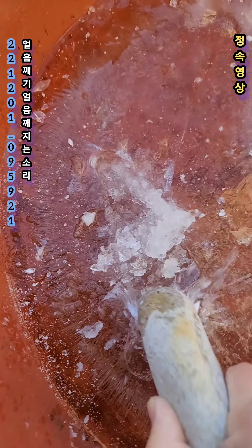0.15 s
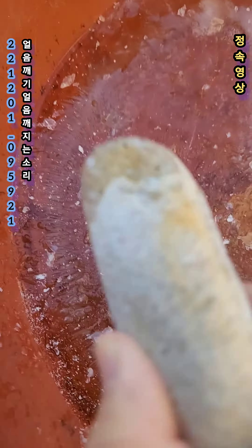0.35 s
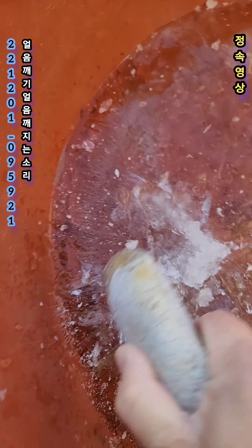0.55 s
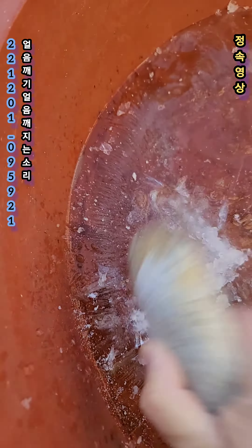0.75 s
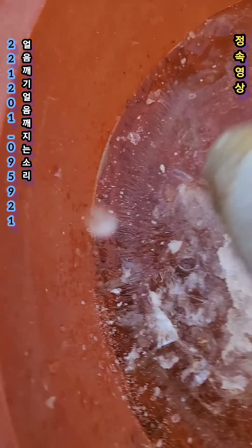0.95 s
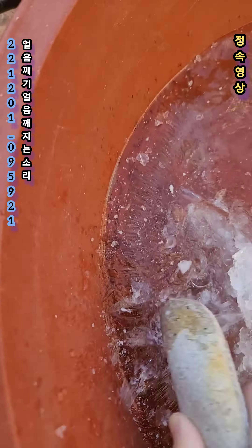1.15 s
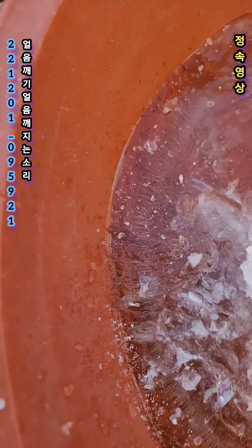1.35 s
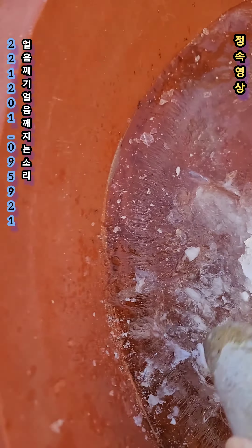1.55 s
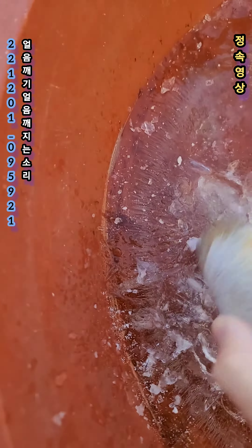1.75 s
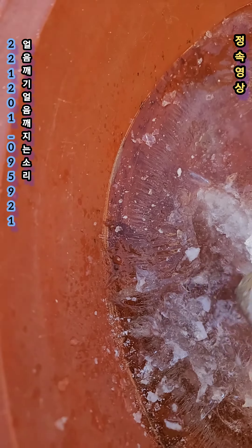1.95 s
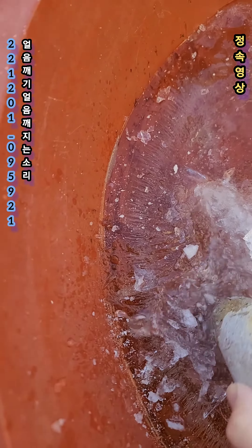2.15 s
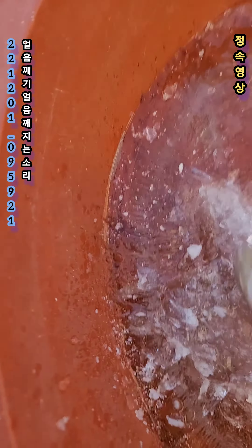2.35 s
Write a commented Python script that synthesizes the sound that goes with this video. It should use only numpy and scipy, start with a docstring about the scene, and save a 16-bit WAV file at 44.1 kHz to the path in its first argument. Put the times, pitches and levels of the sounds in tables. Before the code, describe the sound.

Ice in a plastic tub pounded with a club, seven sharp cracking blows and hollow thuds

```python
"""A wavering low hum in faint outdoor air and one ticking chip, then a club pounds ice in a plastic tub seven times.
Each blow snaps and crushes the ice (filtered noise grains) and draws a short hollow note and clacks (decaying sines).
The tub then rocks on the ground in uneven thuds, mostly softer and softer (a falling sweep and damped modes).
Rattle, chips, crumbs, spray and a last swell of noise at the end are filtered grains too;
the surroundings return a faint tail of decaying noise."""
import sys
import numpy as np
from scipy import signal
from scipy.fft import rfft, irfft
from scipy.io import wavfile

SR = 44100
rng = np.random.default_rng(int(sys.argv[2]) if len(sys.argv) > 2 else 0)


def dump_mix(stems):
    """Bounce the given channels to the path in sys.argv[1] as a 16-bit WAV at rate SR."""
    frames = np.atleast_2d(stems).T  # one column per channel
    limited = np.clip(frames, -1, 1)  # hard clip at full scale
    pcm = np.round(limited * 32767).astype(np.int16)
    wavfile.write(sys.argv[1], SR, pcm)


N = 110250  # samples in the scene
T = np.arange(round(.4 * SR)) / SR  # time axis of a single sound [s]
BEND_LEAD_S = 0.0022  # the bending wave starts this long before the nominal time of a thud or blow


def amp(db):
    """Level law: decibels to amplitude gain."""
    return 10 ** (np.asarray(db) / 20)


def unit(x):
    """Normalisation of mean power: scales to rms 1."""
    return x / np.sqrt(np.mean(x ** 2) + 1e-20)


def read(points, hz):
    """Interpolation of a (frequency, value) table along a logarithmic frequency axis."""
    f, value = np.transpose(points)
    return np.interp(np.log(hz + 1), np.log(f), value)


def add(mix, s, sound):
    """Superposition: sums a stereo sound into the mix from time s [s], cut at the end of the mix."""
    part = mix[:, max(round(s * SR), 0):][:, :sound.shape[1]]
    part += sound[:, :part.shape[1]]


def pan(db):
    """Interchannel level difference: gains of the two channels for left minus right [dB]."""
    return amp([[db / 2], [-db / 2]])


def fade(t, t60):
    """Exponential decay from t = 0, falling 60 dB in t60 seconds."""
    return np.exp(-np.log(1000) * np.maximum(t, 0) / t60)


def heard(lag_s):
    """Interchannel time difference: time since onset in each channel; a positive lag delays the right."""
    return np.maximum(T - np.array([[max(-lag_s, 0)], [max(lag_s, 0)]]), 0)


def colour(x, points, tilt_db=0, ring_hz=1000, ring_db=0, ring_octaves=0.26):
    """Minimum-phase filter of unit energy: a spectrum, one broad ring, and chance resonances."""
    size = 2048
    ripple_db, ripple_width = 3, .05
    hz = abs(np.fft.fftfreq(size, 1 / SR))
    octaves = np.log2(1 + hz / 1000)  # flattens below 1 kHz
    knots = np.arange(0, 5, 2 * ripple_width)
    ripple = np.interp(octaves, knots, rng.standard_normal(len(knots)))
    ring = np.exp(-(np.log2((hz + 1) / ring_hz) / ring_octaves) ** 2)
    gain_db = read(points, hz) + tilt_db * octaves + ring_db * ring + ripple_db * ripple
    log_gain = np.log(amp(gain_db))
    # the Hilbert transform of the log gain gives the phase of a causal filter
    response = np.exp(np.conj(signal.hilbert(log_gain)))
    taps = np.fft.ifft(response).real[:size // 2]
    taps = taps / np.linalg.norm(taps)
    return signal.fftconvolve(x, taps[None], axes=1)[:, :x.shape[1]]


def grains(per_s, spread_db, grain_s, shared):
    """Shot noise: random bursts whose power decays over grain_s; a share of power is alike in both channels."""
    hits = rng.random(len(T)) < per_s / SR
    size = amp(spread_db * np.minimum(rng.exponential(1, len(T)), 4)) * hits
    power = signal.lfilter([1], [1, -np.exp(-1 / (grain_s * SR))], size ** 2)
    noise = rng.standard_normal((3, len(T)))
    shared = np.clip(shared, 0, 1)
    stereo = np.sqrt(shared) * noise[0] + np.sqrt(1 - shared) * noise[1:]
    return unit(np.sqrt(power) * stereo)


def background():
    """Modulated tone in shaped noise: a wavering low hum in outdoor air, whose bass is coherent."""
    # spectrum of the outdoor air: (frequency [Hz], relative level [dB])
    air_colour = [(20, -32), (45, -10), (80, -5), (130, -19.5), (250, -32.5), (400, -40), (700, -37),
                  (1200, -45.5), (2500, -49.5), (5000, -55.5), (7000, -55.5), (16000, -62.5)]
    air_db, hum_db, hum_hz = -36.5, -38, 64.9
    hz, t = np.fft.rfftfreq(N, 1 / SR), np.arange(N) / SR
    noise = rfft(rng.standard_normal((4, N)))
    same = 1 / (1 + (hz / 500) ** 2)  # share of power common to both channels
    stereo = np.sqrt(same) * noise[0] + np.sqrt(1 - same) * noise[1:3]
    air = unit(irfft(stereo * amp(read(air_colour, hz)), N))
    # slow noise sways both amplitude (fraction) and phase [rad]
    waver = .25 * unit(irfft(noise[3] * np.exp(-(hz / 5) ** 2), N))
    hum = unit((1 + waver) * np.sin(2 * np.pi * hum_hz * t + waver))
    return amp(air_db) * air + amp(hum_db) * hum


def chips_and_bursts():
    """Superposed grains: single chips tick; soft bursts of noise swell quickly and thin out."""
    # chips of ice landing: (time [s], level [dB], treble tilt [dB per octave])
    chip_table = [(0.0157, -42, -4.5), (0.208, -41, 1), (0.271, -49, -3), (0.3325, -43.5, -5),
                  (0.351, -34, 4.5), (0.5271, -43.5, -9.5), (0.7972, -28, 1), (.841, -28.5, -6),
                  (0.8652, -38, -7), (.9093, -27, 7), (0.929, -43, -17), (0.94, -40, -11), (1.026, -44, -2),
                  (1.0825, -45.5, 2), (1.162, -35, -10), (1.232, -35, -1), (1.267, -39, -9.5),
                  (1.3263, -40, -5)]
    # soft bursts of noise: crumbs, spray, and a last swell of noise at the end:
    # (time [s], length [s], level [dB], treble tilt [dB per octave])
    burst_table = [(0.11, 0.062, -59, 8), (0.45, 0.09, -49, -3.5), (0.776, 0.12, -40.5, -2),
                   (0.875, 0.096, -35.5, -12), (1.14, 0.12, -44.5, -1.5), (1.485, 0.088, -45.5, -5.5),
                   (1.815, .14, -42, -2.5), (2.102, 0.082, -31.5, -11.5), (2.179, .13, -50.5, -2),
                   (2.413, 0.1, -49.5, -5.5), (2.484, 0.07, -31, -7.5)]
    # spectra of a chip and of the soft bursts: (frequency [Hz], relative level [dB])
    chip_colour = [(500, -35), (2000, -6.5), (4000, -12.5), (6500, -2), (9000, -7), (12000, 1.5),
                   (16000, 0.5)]
    burst_colour = [(200, -5.5), (700, 3), (1600, 0), (3000, 0), (4500, -1.5), (6500, 2.5), (9000, -5.5),
                    (12500, 2), (16000, -9)]
    out = np.zeros((2, N))
    for s, db, tilt_db in chip_table:
        tick = grains(per_s=2000, spread_db=0.5, grain_s=0.00013, shared=0.17) * fade(T, 0.033)
        add(out, s, amp(db) * colour(tick, chip_colour, tilt_db))
    for s, length, db, tilt_db in burst_table:
        arch = np.sin(np.pi * np.minimum(T / length, 1) ** 0.67)
        for _ in range(4):  # layers, each with its own chance resonances
            burst = grains(per_s=800, spread_db=3, grain_s=.0008, shared=.15)
            add(out, s, amp(db) / 2 * colour(arch * burst, burst_colour, tilt_db))
    return out


def ice_note(note_hz):
    """Modal synthesis: a hollow note whose side modes are detuned at random each time."""
    # modes of the struck ice: (nominal multiple of the note, level [dB], t60 [s])
    ice_modes = [(1, 3, 0.032), (.86, -33.5, 0.089), (1.15, -14, 0.055), (1.36, -25, 0.084),
                 (1.6, -13, 0.022), (2.35, -23.5, 0.031), (3.05, -36.5, 0.1), (3.9, -7.5, 0.0082)]
    t = heard(.00008)
    detune = rng.uniform(-0.83, 1, len(ice_modes))
    note = 0
    for (ratio, db, t60), d in zip(ice_modes, detune):
        hz = note_hz * ratio ** (1 + 0.124 * d)
        note = note + amp(db) * fade(t, t60) * np.sin(2 * np.pi * hz * t)
    return pan(-3.5) * note


def tub_thud():
    """Dispersion and modal decay: a falling bending wave runs through the tub and its low modes ring."""
    # modes of the filled tub: (frequency [Hz], level [dB], t60 [s], direction of swing [signed factor])
    tub_modes = [(73.7, -8, 0.22, -0.64), (88.15, -5, 0.91, -0.081), (155.5, -3, 0.11, -0.75),
                 (202.1, -21, 0.15, 0.52), (229.2, 7.5, 0.03, 0.63), (277, -2, 0.058, 0.2),
                 (600, -16.5, 0.029, -0.48), (703, -19, 0.024, 0.74)]
    # the highs of a bending wave arrive first
    from_hz, to_hz, glide_s, peak_s, bend_db = 1667, 188.7, 0.0009714, 0.0086, -7
    settle_s = 0.0016  # the modes start this long after the nominal time
    t = heard(.00025)
    turns = to_hz * t + (from_hz - to_hz) * glide_s * (1 - np.exp(-t / glide_s))
    swell = (t / peak_s * np.exp(1 - t / peak_s)) ** 2
    bend = swell * np.sin(2 * np.pi * turns)
    u = np.maximum(t - BEND_LEAD_S - settle_s, 0)
    ring = 0
    for hz, db, t60, swing in tub_modes:
        ring = ring + swing * amp(db) * fade(u, t60) * np.sin(2 * np.pi * hz * u)
    soft = signal.butter(2, 1100, fs=SR, output="sos")
    return pan(-0.5) * signal.sosfilt(soft, ring - amp(bend_db) * bend)


def blows():
    """Impact and fracture: the club touches, snaps and crushes the sheet while ice and tub ring."""
    # blows of the club: (time [s], snap level [dB], snap ring [Hz], ring boost [dB],
    # crunch level [dB], crunch length before decay [s], crunch ring [Hz], ring boost [dB],
    # crunch tilt [dB per octave], hollow note [Hz], note level [dB], note delay [s],
    # first touch level [dB], tub level [dB])
    blow_table = [(0.1209, -2.5, 3380, 16, -24.5, 0.0025, 5140, 17, 1, 510.5, -1.5, 0.0013, -13, 1),
                  (0.436, -10.5, 1360, 16.5, -15.5, 0.014, 810, 1.5, -1.5, 492, 8.5, 0.00094, -2, -4),
                  (0.7675, -6.5, 6300, 3, -12, 0.013, 1550, 4, 1.5, 500, -2, 0.00093, -11, -8),
                  (1.1351, -9, 1106, 7, -23.5, 0.014, 765, 7, 0.5, 482.5, 5, 0.00045, -2.5, -13),
                  (1.4778, -6, 2020, 8, -23, 0.015, 1090, 5.5, 1, 481, 1, .001, -11, -3),
                  (1.763, -16, 6700, 0, -14.5, 0.022, 2150, 9, 1.5, 503, -8.5, 0.00098, -26, -6),
                  (2.0927, -6, 1610, 8, -16.5, 0.031, 1480, 4, -1, 461, -7.5, 0.0095, -20, -10)]
    # spectra of the snap and of the crunch: (frequency [Hz], relative level [dB])
    snap_colour = [(150, 15), (600, 10), (1500, 10), (3200, -0.5), (5500, 1), (8500, -4), (12000, -2),
                   (16000, 3)]
    crunch_colour = [(120, 8.5), (450, 9), (900, -4), (1600, -4), (2600, -14), (4500, -18), (6500, -15.5),
                     (9000, -21), (15500, -20)]
    touch_lead_s, crunch_rise_s = 0.0066, 0.0052
    out = np.zeros((2, N))
    low = signal.butter(2, 170, fs=SR, output="sos")
    push = signal.sosfilt(low, tub_thud())
    press = np.minimum(T / touch_lead_s, 1)
    split = amp(5.5) * fade(T, 0.0086) + fade(T, 0.018)  # a fast fracture over a slower decay
    for (s, snap_db, ring_hz, ring_db, crunch_db, length, crunch_hz, boost_db,
         tilt_db, note_hz, note_db, delay, touch_db, tub_db) in blow_table:
        crackle = grains(per_s=12000, spread_db=1.0, grain_s=0.00091, shared=0.01)
        snap = colour(crackle * split, snap_colour, 0, ring_hz, ring_db)
        snap_tail = amp(-24) * colour(crackle * fade(T, 0.14), snap_colour)

        crunch = grains(per_s=2700, spread_db=-1.5, grain_s=0.0008, shared=0.25)
        crunch = crunch * np.minimum(T / crunch_rise_s, 1) * fade(T - length, 0.081)
        crunch = colour(crunch, crunch_colour, tilt_db, crunch_hz, boost_db, ring_octaves=.65)

        scrape = grains(per_s=1300, spread_db=-5.0, grain_s=0.000073, shared=1.0)
        scrape = scrape * press * fade(T - touch_lead_s, 0.0023)
        scrape = amp(snap_db - 11) * colour(scrape, snap_colour, 1, ring_hz, ring_db)
        touch = amp(touch_db) * press * ice_note(note_hz)

        add(out, s - touch_lead_s, touch + scrape)
        add(out, s, amp(snap_db) * (snap + snap_tail))
        add(out, s + delay, amp(note_db) * ice_note(note_hz))
        add(out, s, amp(crunch_db) * pan(-2) * crunch)
        add(out, s - BEND_LEAD_S, amp(tub_db) * push)
    return out


def clacks():
    """Damped free vibration: each clack has its own pitch; high ones die sooner."""
    # short pitched clacks and knocks at blows, small thuds and loose ice:
    # (time [s], frequency [Hz], level [dB])
    clack_table = [(0.1205, 3080, -18), (0.1205, 3750, -12), (0.1205, 4860, -15), (0.203, 680, -26.5),
                   (0.4355, 780, -7), (0.4355, 1560, -26), (0.768, 814, -5.5), (0.768, 2050, -12),
                   (0.775, 1440, -22), (0.796, 1360, -15.5), (0.868, 1470, -24), (0.934, 2880, -40),
                   (0.981, 632, -28.5), (1.135, 830, -10.5), (1.349, 696, -29.5), (1.4775, 1060, -17),
                   (1.658, 590, -29.5), (1.777, 2540, -29), (1.789, 1664, -10.5), (2.132, 720, -15)]
    out, t = np.zeros((2, N)), heard(0.00021)
    for s, hz, db in clack_table:
        t60 = .038 * np.sqrt(800 / hz)  # 38 ms at 800 Hz
        add(out, s, amp(db) * fade(t, t60) * np.sin(2 * np.pi * hz * t))
    return out


def rocking():
    """Repeated impact: each landing of the tub thuds; loose ice inside shifts just before and is jolted."""
    # the tub comes down on the ground: (time [s], thud level [dB], rattle level [dB])
    thud_table = [(0.1683, -1.5, -27), (0.204, -25.5, -22.5), (0.2382, -8, -41), (0.2796, -18.5, -39),
                  (0.5028, -0.5, -44.5), (0.5591, -15, -22), (0.5995, -4, -39), (0.6668, -11.5, -71),
                  (0.7073, -20, -61), (0.8379, 1, -6), (0.8645, -12.5, -42), (0.9024, -13, -25),
                  (0.9418, -1.5, -29), (0.979, -28, -25), (1.0175, -9.5, -36), (1.0614, -21.5, -44.5),
                  (1.2056, 1.5, -11), (1.2336, -13, -45), (1.27, -11.5, -42), (1.31, -2, -26.5),
                  (1.3483, -26.5, -19), (1.3862, -9.5, -33), (1.4309, -21.5, -36), (1.5367, 0, -13.5),
                  (1.5904, -17.5, -15), (1.6293, -5, -17), (1.659, -28, -23), (1.6900, -12, -44),
                  (1.728, -21, -56), (1.8305, -7, -23.5), (1.8699, -17.5, -59), (2.1468, -1.5, -17),
                  (2.1993, -9, -21), (2.2323, -25.5, -55)]
    # spectrum of the rattling ice: (frequency [Hz], relative level [dB])
    rattle_colour = [(200, 16.5), (500, 8.5), (850, -5.5), (1200, -18.5), (2000, -14), (3200, -53),
                     (7000, -64), (16000, -28)]
    lead_s, lead_db = 0.00604, -5  # the shift ahead of the landing
    out, thud = np.zeros((2, N)), tub_thud()
    jolt = np.where(T < lead_s, amp(lead_db), fade(T - lead_s, 0.033))
    for s, thud_db, rattle_db in thud_table:
        rattle = grains(per_s=7600, spread_db=3, grain_s=0.00022, shared=0.09) * jolt
        add(out, s - BEND_LEAD_S, amp(thud_db) * thud)
        add(out, s - lead_s, amp(rattle_db) * colour(rattle, rattle_colour))
    return out


def yard(x):
    """Reverberation: convolution with a short noise tail, decaying at a rate set by frequency."""
    # decay of the surroundings: (frequency [Hz], t60 [s])
    yard_decay = [(100, 0.24), (500, 0.23), (2000, 0.22), (8000, 0.15), (16000, 0.17)]
    # spectrum of the tail: (frequency [Hz], relative level [dB])
    yard_colour = [(100, 2.5), (300, 1.5), (490, -9.5), (750, 5.5), (1500, -16.5), (3500, -16.5),
                   (16000, -7)]
    hz, t, noise = signal.stft(rng.standard_normal((2, len(T))), SR, nperseg=256)
    gain = amp(read(yard_colour, hz))[:, None]
    decay = fade(t, read(yard_decay, hz)[:, None])
    rise = np.minimum(t / 0.0036, 1)
    tail = signal.istft(noise * gain * decay * rise, SR)[1]
    return signal.fftconvolve(x, tail / np.linalg.norm(tail[0]), axes=1)[:, :N]


def microphones(x):
    """Spatial coherence: a close pair cannot tell low sounds apart, so the side signal loses its bass."""
    side_from_hz = 240
    mid, hz = x.mean(0), np.fft.rfftfreq(N, 1 / SR)
    side = irfft(rfft(x - mid) * hz / np.hypot(hz, side_from_hz), N)
    return mid + side


def scene():
    """Superposition: blows, clacks, rocking tub, chips and soft bursts in the open, over the hum."""
    yard_db = -19.5
    near = blows() + clacks() + rocking() + chips_and_bursts()
    return microphones(near + amp(yard_db) * yard(near)) + background()


def record(dry):
    """Overload and band limit: peaks beyond full scale are clipped, then a low-pass removes the top."""
    edge = signal.firwin(255, 16000, window=("kaiser", 8), fs=SR)  # cutoff [Hz]
    return signal.oaconvolve(np.clip(dry, -1, 1), edge[None], "same")


dry = scene()
out = record(dry)
dump_mix(out)
```